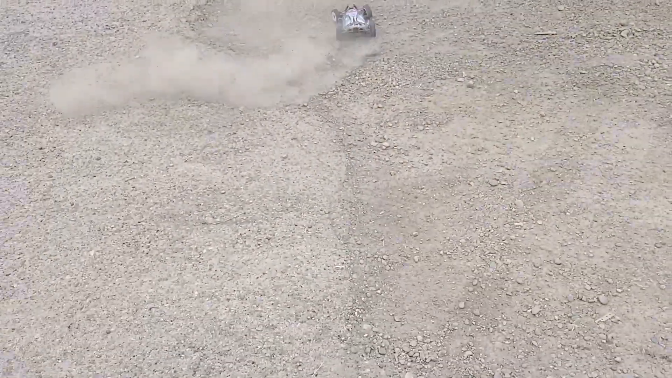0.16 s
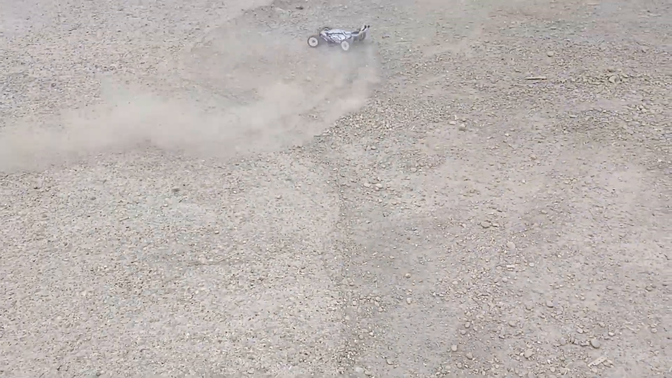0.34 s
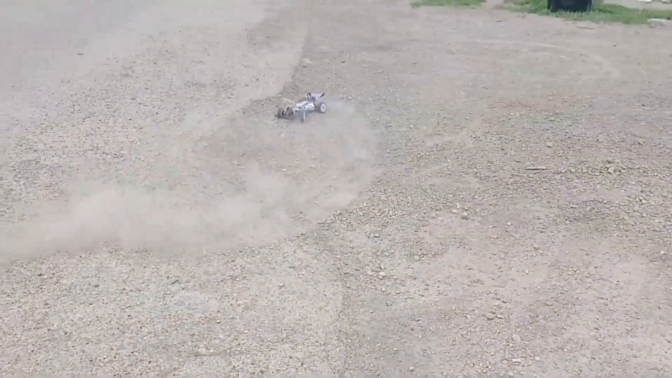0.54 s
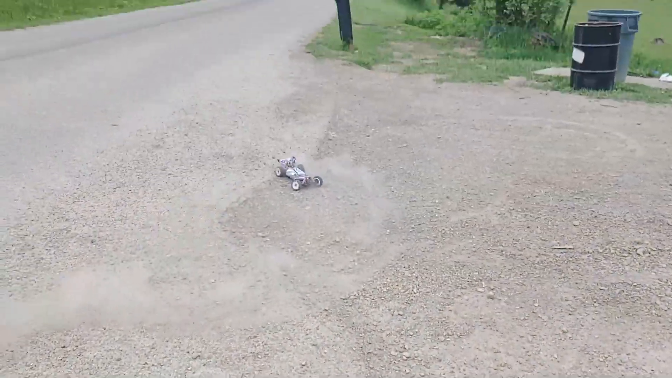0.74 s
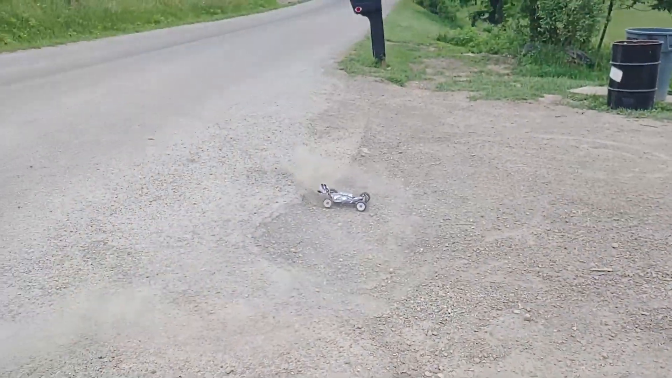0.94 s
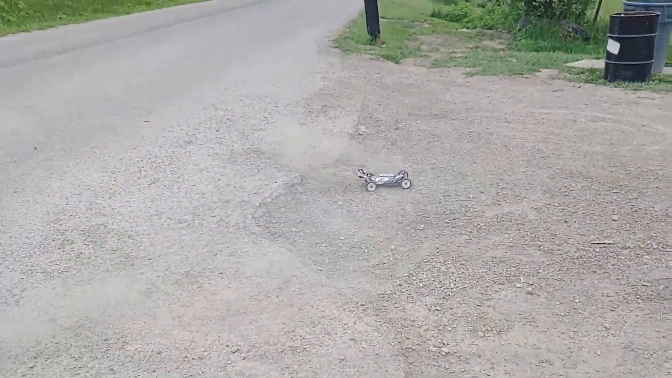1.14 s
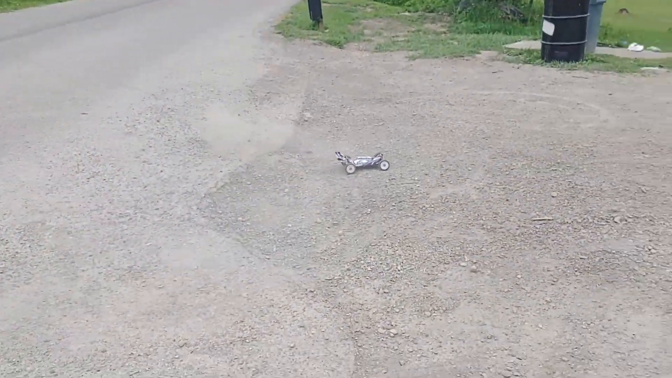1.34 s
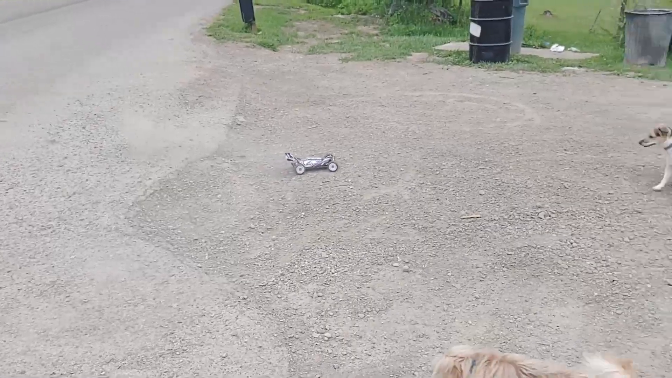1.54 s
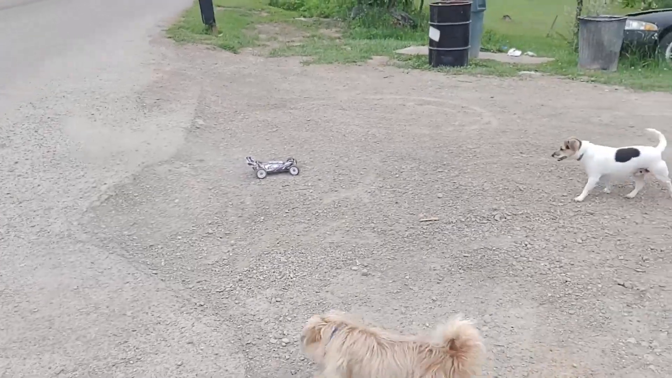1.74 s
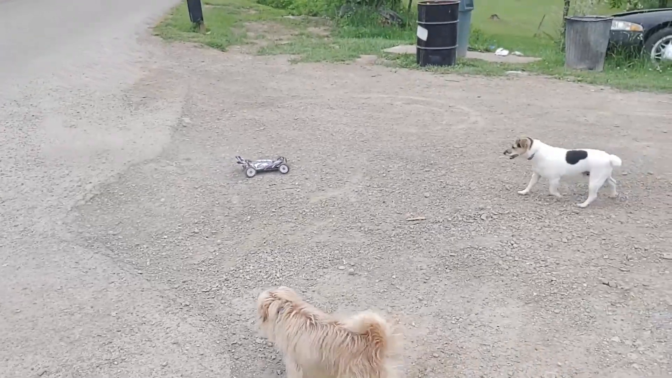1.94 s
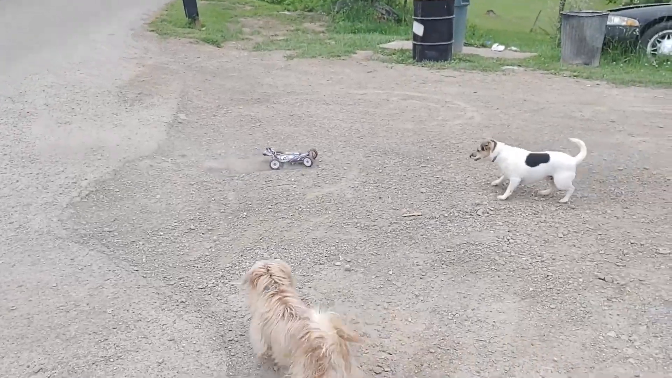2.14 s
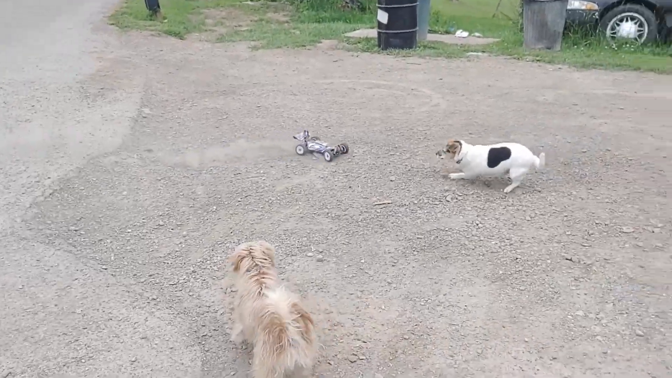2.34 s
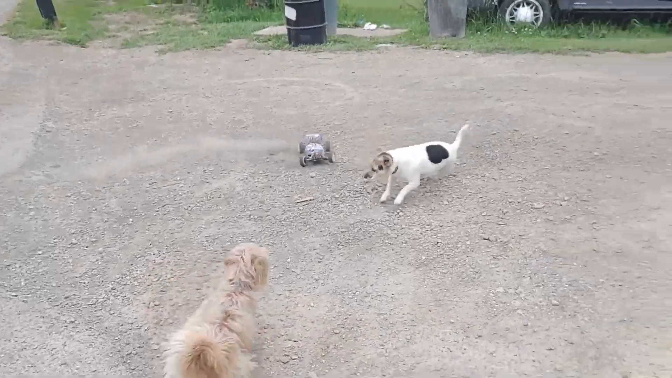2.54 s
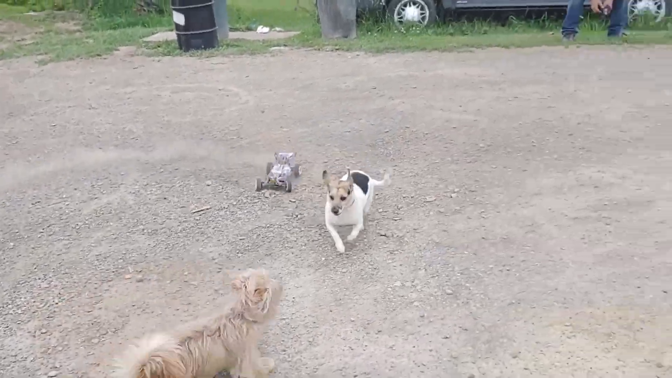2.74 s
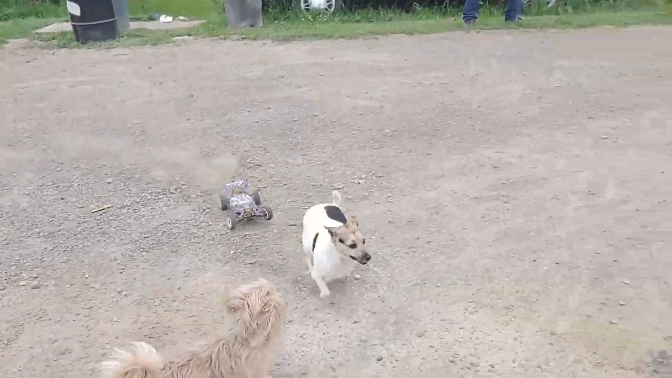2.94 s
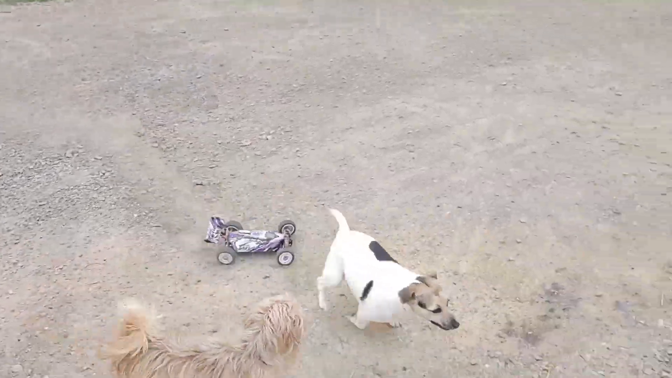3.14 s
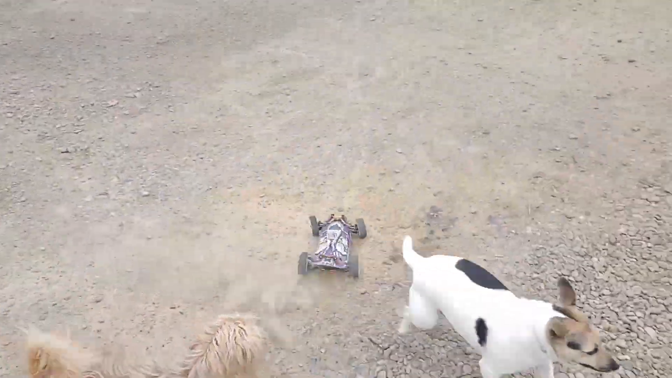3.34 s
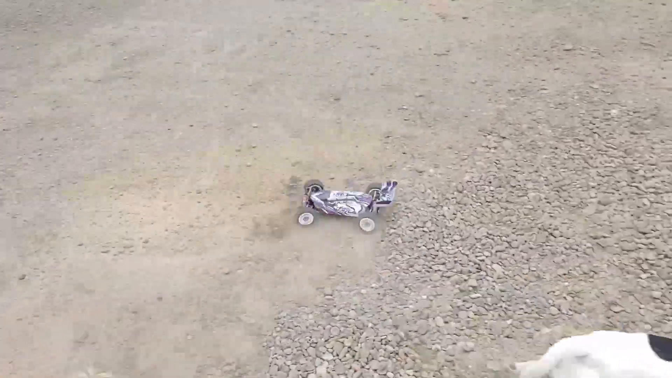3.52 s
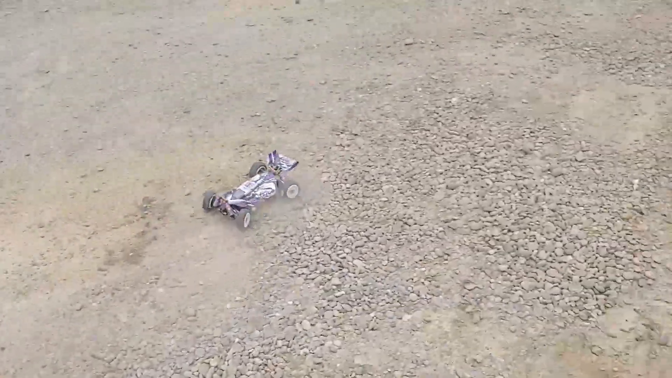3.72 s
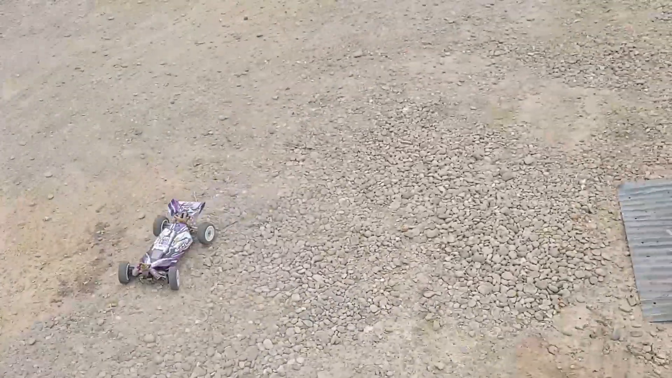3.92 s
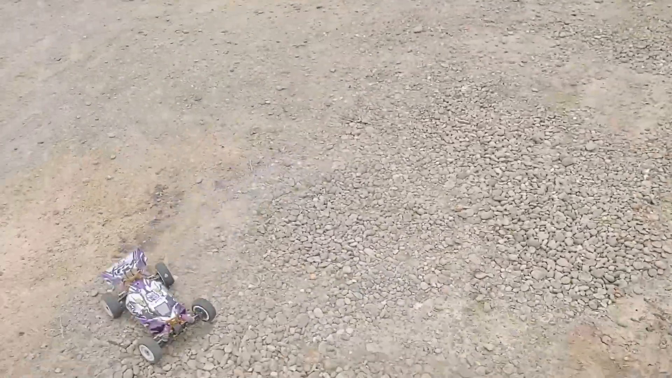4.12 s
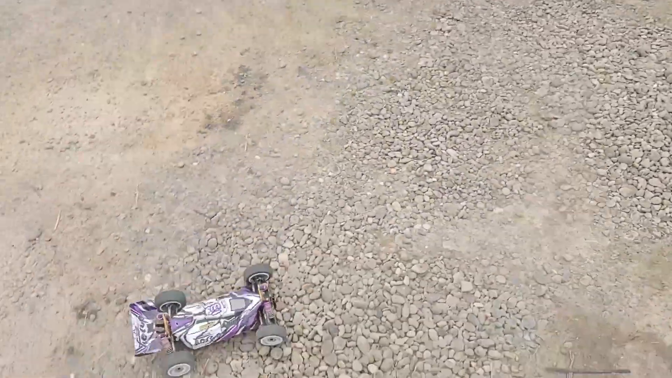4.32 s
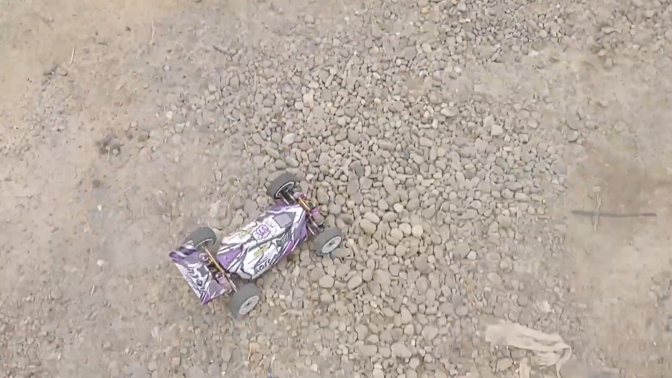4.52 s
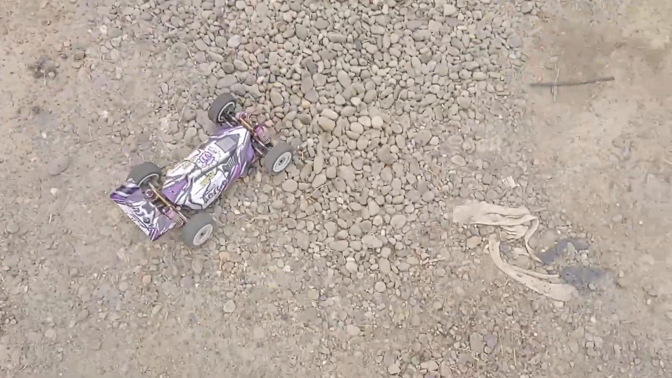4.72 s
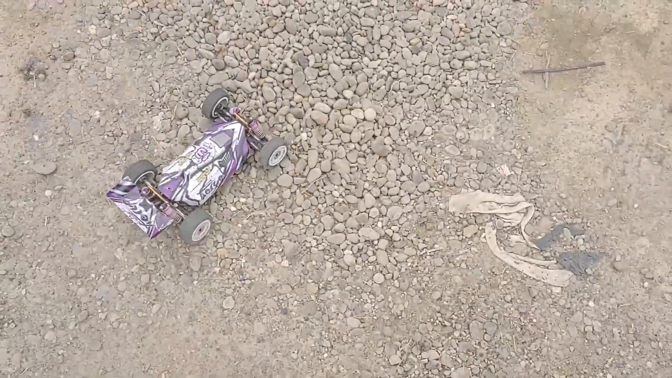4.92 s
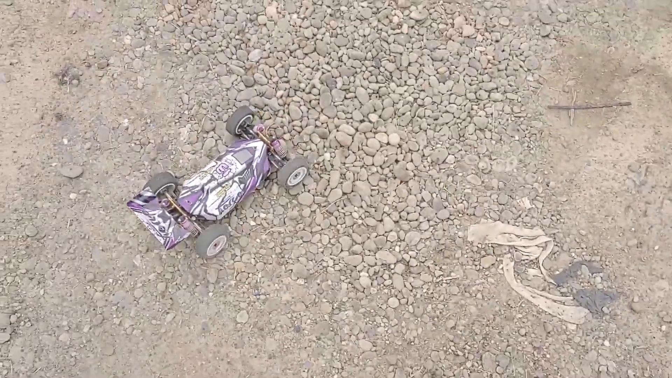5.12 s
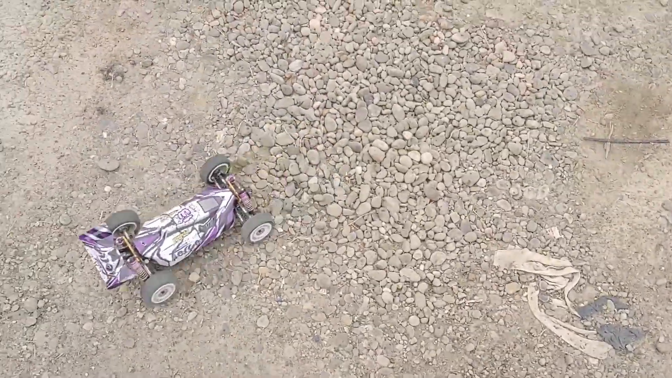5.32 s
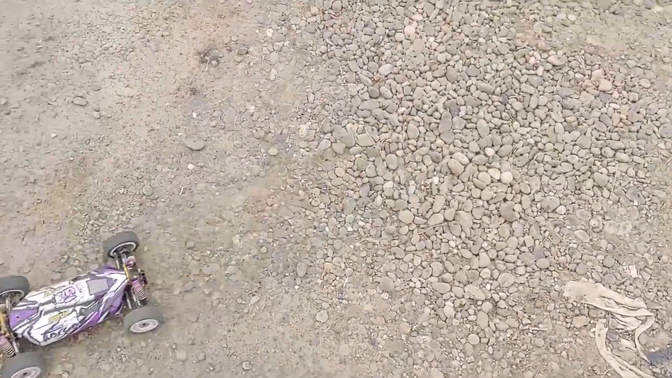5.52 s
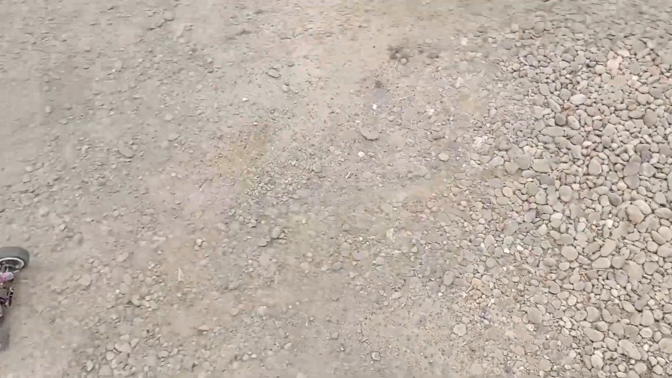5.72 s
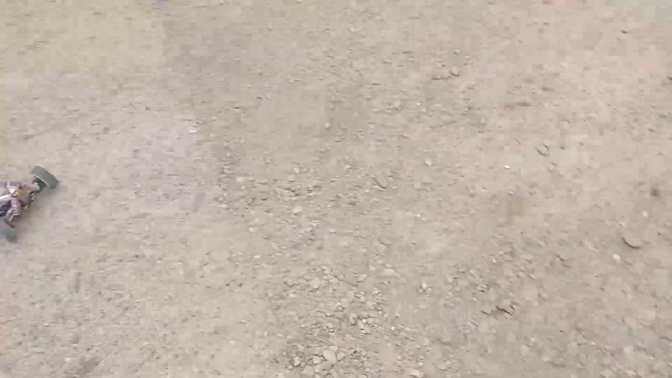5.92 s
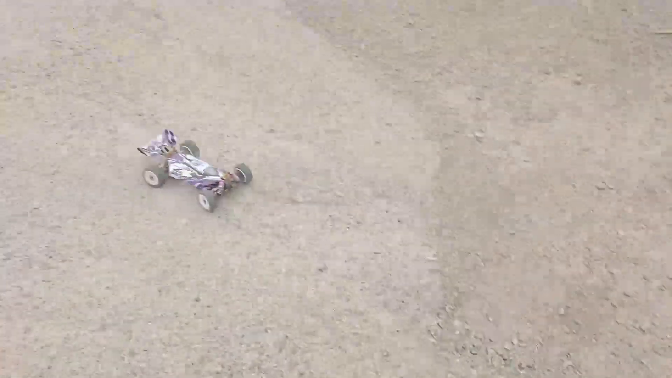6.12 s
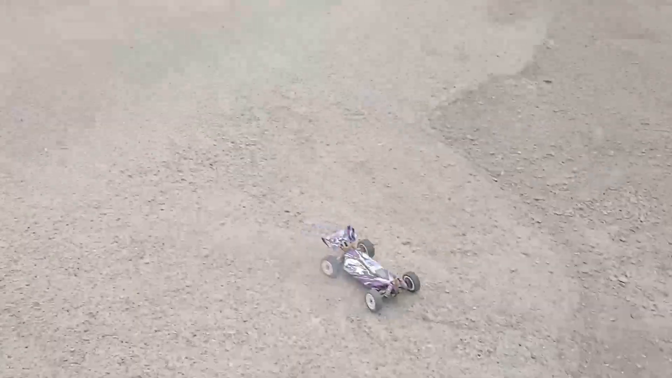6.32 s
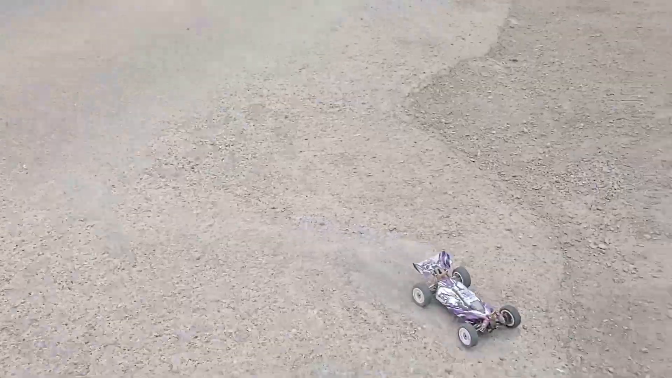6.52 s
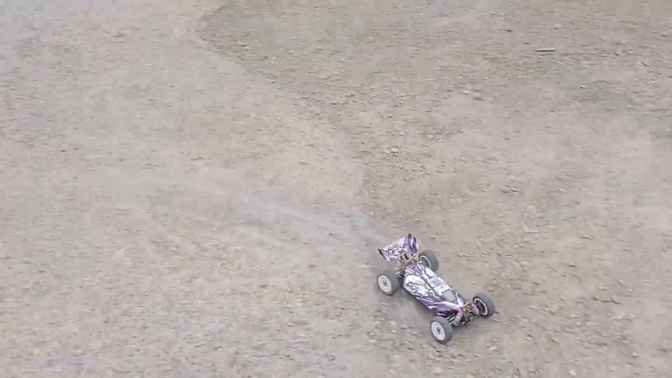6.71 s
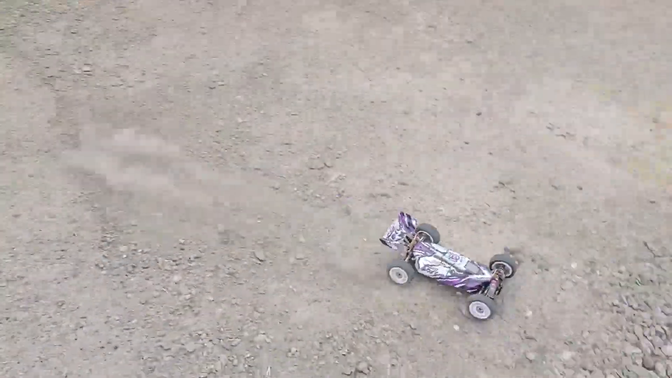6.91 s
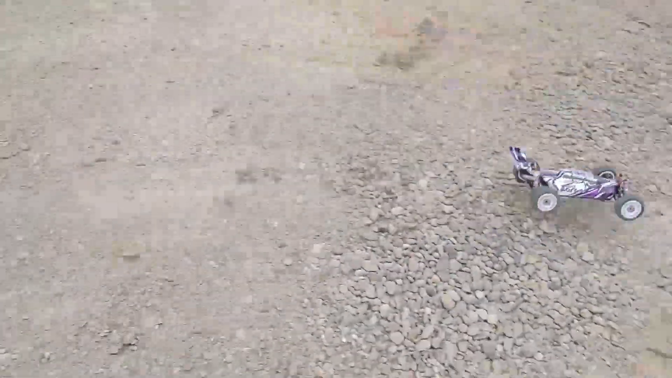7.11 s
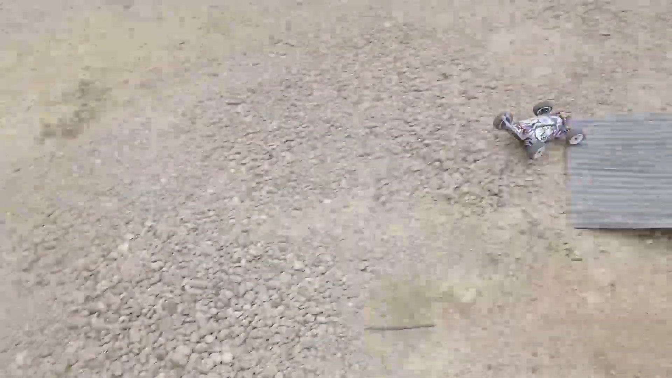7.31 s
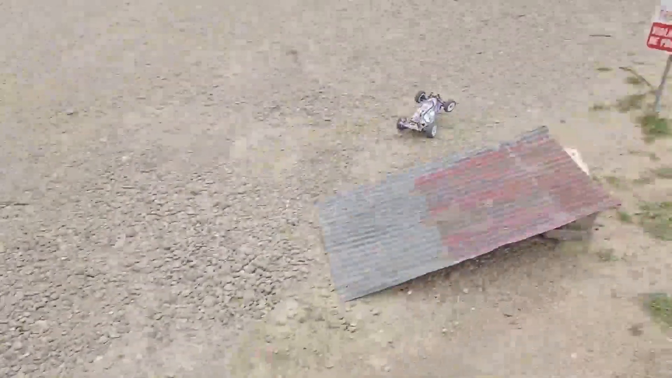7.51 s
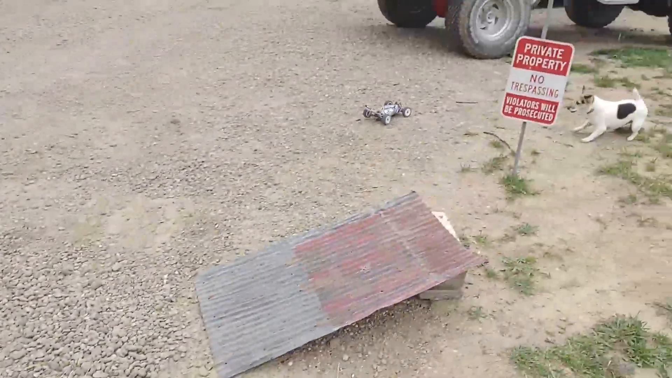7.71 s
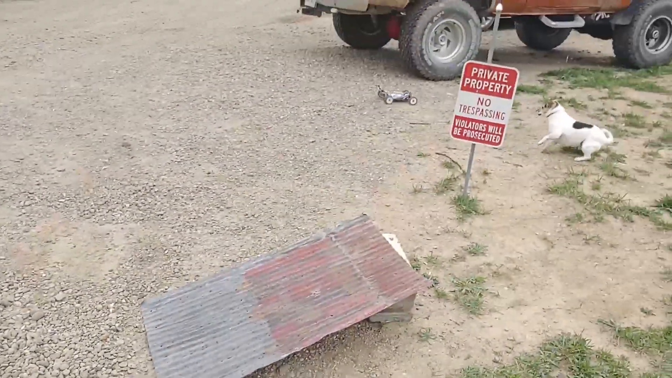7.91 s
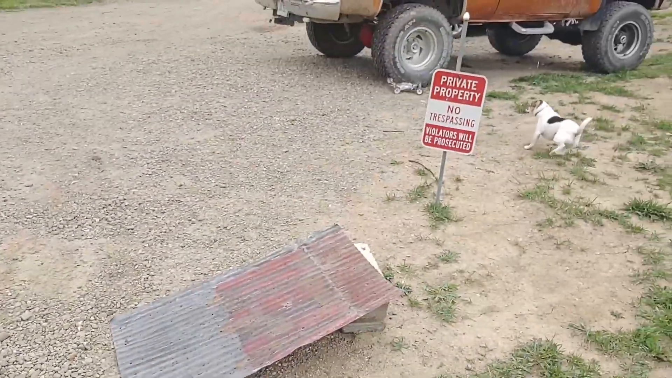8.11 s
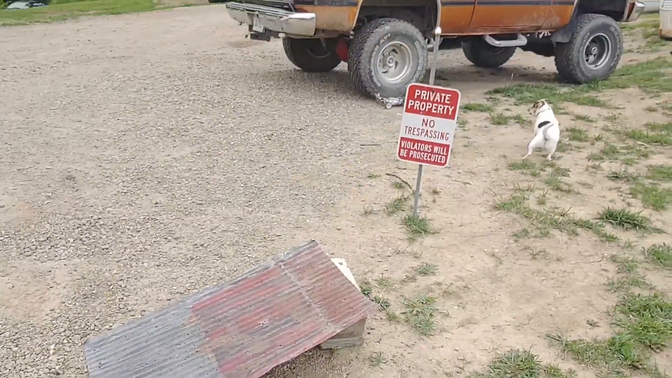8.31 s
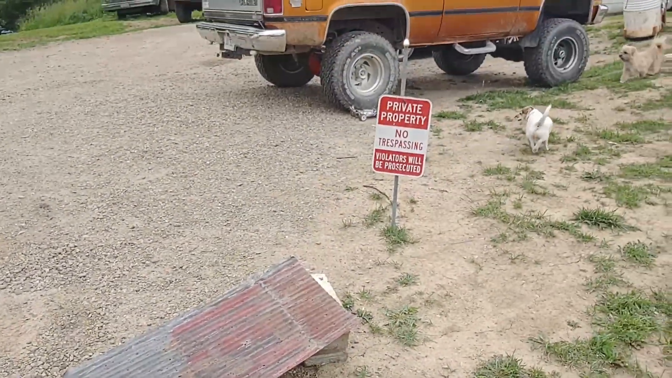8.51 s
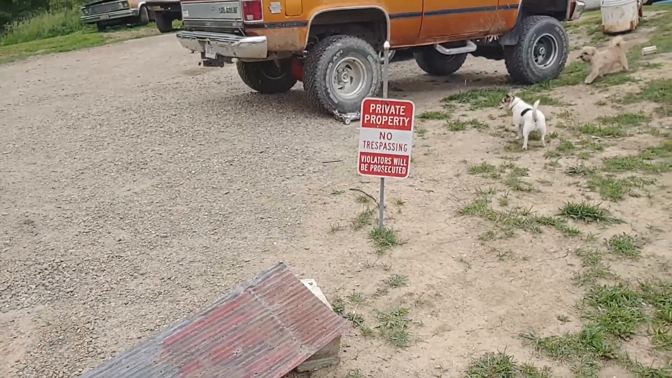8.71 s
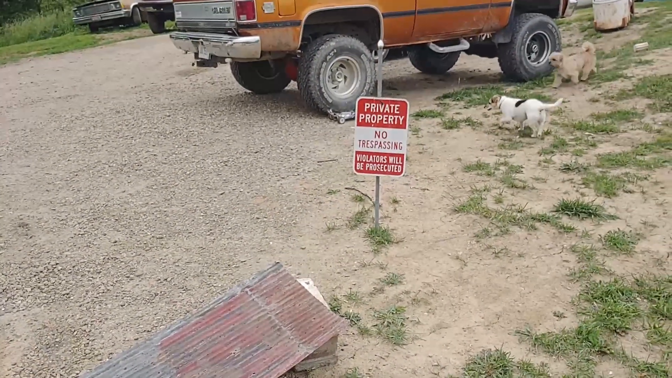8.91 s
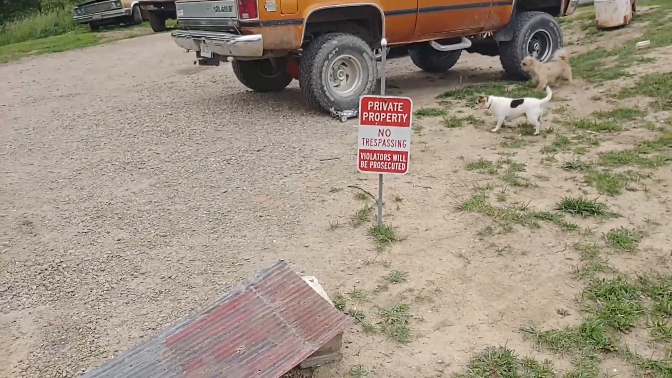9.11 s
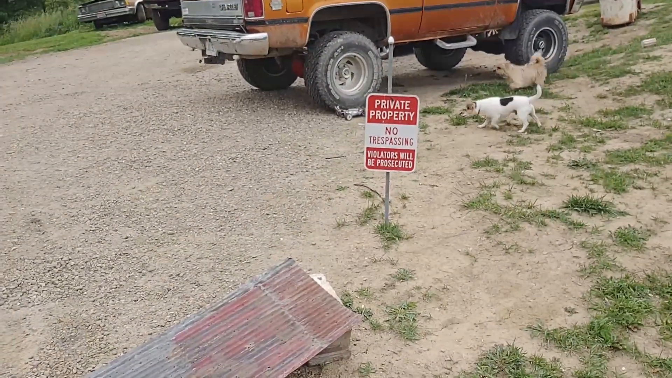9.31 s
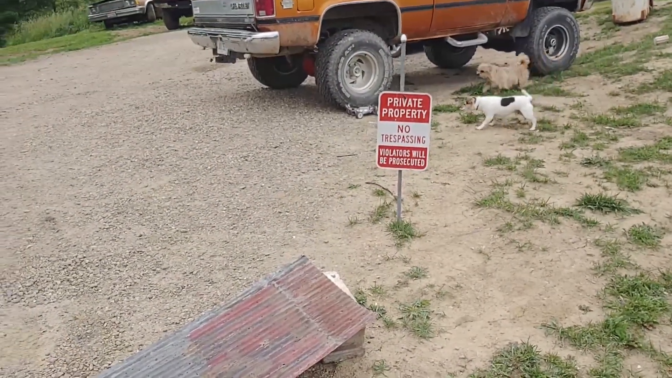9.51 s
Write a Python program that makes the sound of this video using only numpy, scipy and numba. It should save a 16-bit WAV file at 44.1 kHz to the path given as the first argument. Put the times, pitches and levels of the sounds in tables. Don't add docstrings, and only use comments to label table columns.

```python
import sys
import numpy as np
from scipy import signal
from scipy.fft import rfft, irfft, next_fast_len
from scipy.io import wavfile
from scipy.ndimage import uniform_filter1d, map_coordinates
from numba import njit

SR = 44100
rng = np.random.default_rng(int(sys.argv[2]) if len(sys.argv) > 2 else 0)


def gain_from_db(level_db):
    decades = np.asarray(level_db, float) / 20
    return 10 ** decades


def generate_wav(signal):
    frames = np.transpose(np.atleast_2d(signal))
    scaled = np.clip(frames, -1, 1) * 32767
    pcm = np.round(scaled).astype(np.int16)
    wavfile.write(sys.argv[1], SR, pcm)


N = 421155


def rms_one(x):
    return x / np.sqrt(np.mean(x ** 2) + 1e-20)


def in_time(rows):
    s, *columns = np.transpose(rows)
    return [np.interp(np.arange(N) / SR, s, column) for column in columns]


def coloured(x, points, share=1, late=((1, 0), (2, 0))):
    size = next_fast_len(N + 2048)
    hz = np.arange(1, size // 2 + 2) * SR / size
    points_hz, points_db = np.transpose(points)
    gain = gain_from_db(share * np.interp(np.log(hz), np.log(points_hz), points_db))
    lag = np.exp(-1j * np.interp(hz, *np.transpose(late)))
    return irfft(rfft(x, size) * gain * lag, size)[..., :N]


def passed(x, hz, kind, order=2):
    return signal.sosfilt(signal.butter(order, hz, kind, fs=SR, output="sos"), x)


def drift(hz):
    r = np.exp(-2 * np.pi * hz / SR)
    walk = signal.lfilter([1], [1, -2 * r, r * r], rng.standard_normal(N + SR))
    return rms_one(walk[SR:])


def grains(per_s, coarse_db, clump_db):
    born = rng.random(N) < per_s * gain_from_db(clump_db * drift(25)) / SR
    size_db = coarse_db * np.minimum(rng.exponential(1, N), 4.4)
    clicks = born * gain_from_db(size_db) * rng.choice([-1, 1], N)
    return clicks / np.sqrt(uniform_filter1d(clicks ** 2, SR // 4) + 1e-3)


@njit
def resonate(x, hz, r):
    y = np.zeros(len(x))
    for i in range(2, len(x)):
        y[i] = x[i] - x[i - 2] + 2 * r * np.cos(hz[i]) * y[i - 1] - r * r * y[i - 2]
    return y * (1 - r * r) / 2


def ring(x, hz, width_hz):
    turn = 2 * np.pi / SR * hz * np.ones(len(x))
    return resonate(x + 1e-18, turn, np.exp(-np.pi * width_hz / SR))


def body(x, modes):
    total = 0
    for k, (hz, width_hz, db) in enumerate(modes):
        total = total + gain_from_db(db) * ring(x, hz, width_hz) * (-1) ** k
    return rms_one(total)


# t/s, tyre effort level/dB, motor load level/dB,
# hollow underside facing us level/dB, treads digging in level/dB
FIRST_RUN = [
    (0, -30.5, -29.5, -6, 3.5),
    (.55, -30, -33.5, -1, 2),
    (.8, -29, -30, -11, -1),
    (1.05, -32, -31, 0, 1),
    (1.2, -45.5, -50, 0, -1),
    (1.44, -51, -57, -37, 1),
    (1.68, -58, -68.5, -5, -3),
    (1.99, -65, -74, -25, -31),
]
SECOND_RUN = [
    (2.0, -66, -66, 0, -8),
    (2.05, -61.5, -45, -2.5, -1.5),
    (2.4, -31.5, -31, -5.5, 0),
    (2.95, -28, -36, -5, 3.5),
    (3.6, -21.5, -28, -6.5, 4),
    (4.35, -28.5, -28.5, -12, -2),
    (4.53, -22, -41.5, 8.5, 6),
    (4.93, -46.5, -66, -3, 7.5),
    (5.19, -49.5, -54, -4, 1.5),
]
REVERSE_RUN = [
    (5.225, -55, -53.5, 4.5, 1),
    (5.37, -32.5, -34, 0.5, -1.5),
    (5.58, -30, -32, 4, 0.5),
    (5.8, -29.5, -35, 3.5, -2),
    (6.0, -36.5, -39.5, 4.5, -0.5),
]
LAST_RUN = [
    (6.02, -41, -27.5, -4.5, -13),
    (6.11, -27.5, -18.5, -20, -9.5),
    (6.4, -26, -22.5, -10, -4),
    (6.75, -24, -25.5, -3.5, 1),
    (7.05, -24.5, -34.5, 0, 9.5),
    (7.4, -21, -38.5, -5.5, 6),
    (7.65, -28, -30, -1.5, 6),
    (8.1, -29.5, -46.5, 0.5, 7.5),
]
ROLL_AWAY = [
    (8.3, -41, -60.5, 13.5, 12.5),
    (8.45, -52, -65.5, 7, 15.7),
    (8.6, -59, -57, 7.8, 7.9),
    (8.8, -62, -65, 0.5, 4.5),
    (9.55, -91, -92, 23, 8),
]
# t/s, body level/dB, grit level/dB, half length/s
RUTS = [(0.033, 7.5, -4, 0.033), (0.053, -13, 5.5, 0.042), (0.1, -3, -11, 0.05), (0.345, 5, 8, 0.042),
        (0.614, 11.5, 2, 0.0092), (0.92, -9.5, -4, 0.04), (1, -4, -1, 0.032), (1.365, 9, 9, 0.08),
        (2.62, 4, 8.5, 0.045), (2.897, 8.5, 7.5, 0.029), (3.33, 9, -2, 0.013), (3.67, 10.5, 9.5, 0.02),
        (3.716, -13, -3.5, 0.047), (3.805, -4, 15.5, 0.036), (3.88, -6, -14.5, 0.097),
        (3.983, 7, -5, 0.028), (4.04, -9.5, -6, 0.089), (4.445, 1.5, -12, 0.042), (6.25, -3.5, -1, 0.077),
        (6.7, -1, 3.5, 0.063), (7.155, 3.5, 8.5, 0.035), (7.231, -8.5, -3, 0.093), (7.39, 18, 13, 0.021),
        (7.412, -34, -9.5, 0.028), (7.624, 5, 4.5, 0.043), (7.829, -5, -10, 0.034), (8.009, -9, 25, 0.018),
        (8.12, 6, 0.5, 0.03), (8.256, 14, 8.5, 0.074)]


def buggy_levels():
    runs = FIRST_RUN + SECOND_RUN + REVERSE_RUN + LAST_RUN + ROLL_AWAY
    tyre_db, motor_db, facing_db, dig_db = in_time(runs)
    s, body_db, grit_db, half_s = np.transpose(RUTS)
    t = np.arange(0, N + 64, 64) / SR
    humps = np.clip(1 - np.abs(t[:, None] - s) / np.clip(half_s, .005, .2), 0, 1)
    jolt_db = np.interp(np.arange(N) / SR, t, humps @ body_db)
    spit_db = np.interp(np.arange(N) / SR, t, humps @ grit_db)
    spray_db = tyre_db + spit_db
    crush_db = motor_db + dig_db + 0.89 * jolt_db
    drone_db = motor_db + facing_db + 1.33 * jolt_db
    whine_db = motor_db + jolt_db
    rumble_db = -15.5 + 0.92 * motor_db + 0.23 * facing_db + 1.44 * dig_db + jolt_db
    return (spray_db, crush_db), (drone_db, whine_db, rumble_db)


# f/Hz, level/dB
SPRAY_COLOUR = [(880, -45), (1500, -15), (2630, -13.5), (4010, -13), (9500, -11), (11700, -8),
                (15400, -14.5), (16500, -35.5)]
# t/s, crush centre f/Hz, gear case ring f/Hz, coarseness of grains level/dB
GROUND = [(0.0, 1610, 2730, 2), (1.59, 1110, 2904, 5), (1.75, 1320, 2775, 4.5), (3.38, 1570, 2845, -1),
          (3.48, 1240, 2650, 1.5), (3.83, 1130, 2760, -2.5), (4.41, 1390, 2650, 7), (4.68, 1180, 3010, 7.5),
          (4.81, 1510, 2740, 7.5), (5.8, 1180, 2970, 1.5), (6.06, 1470, 3246, 0.5),
          (6.89, 1220, 2594, -6.5), (7.24, 1610, 3280, -0.5), (7.62, 792, 2730, 1), (7.79, 1400, 2560, 1),
          (8.03, 1750, 2706, 5.5), (8.4, 1330, 2620, 4), (9.55, 1435, 2860, 2)]


def tyres(bumps, spray_db, crush_db):
    crush_hz, _, coarse_db = in_time(GROUND)
    grit = grains(7000, coarse_db, clump_db=4.5)
    dealt = rng.integers(0, 8, N)
    chinks = 0
    for k, hz in enumerate(np.geomspace(2500, 15000, 8)):
        chinks = chinks + ring(grit * (dealt == k), hz, hz / 13.0) / np.sqrt(hz / 4000)
    spray = rms_one(coloured(rms_one(chinks) * 0.15 + .5 * grit, SPRAY_COLOUR))
    grind = grains(2500, 0.76 * coarse_db, clump_db=5.0)
    ridge = rms_one(ring(grind, crush_hz, 260))
    crush = rms_one(ridge + rms_one(passed(grind, [650, 1850], "band")))
    return gain_from_db(spray_db + 0.42 * bumps) * spray + gain_from_db(crush_db + 0.95 * bumps) * crush


# t/s, f/Hz, level/dB
MESH = [(.3, 5200, -70), (.45, 5400, -44), (1.1, 5550, -44), (1.25, 5500, -95), (2.5, 4900, -80),
        (2.8, 5000, -40), (3.1, 5300, -34), (3.4, 5200, -60), (4.33, 5050, -40), (4.5, 5000, -95),
        (5.25, 2500, -95), (5.45, 3200, -37), (5.75, 4900, -33), (5.9, 3700, -34), (6.0, 3300, -75),
        (6.1, 4800, -31), (6.38, 7700, -33), (6.55, 8500, -110)]
# f/Hz, width f/Hz, level/dB
CHASSIS = [(390, 193, -1.5), (447.4, 160, 6), (576, 162, 2.5)]
# multiple of the case ring [ratio], width f/Hz, level/dB
GEAR_CASE = [(.9, 260, 16.5), (1.0, 284, 24), (1.78, 540, 8.5)]


def drive(bumps, drone_db, whine_db, rumble_db):
    rattle = grains(2000, 4.9, clump_db=3.0)
    teeth = grains(7000, 0.94, clump_db=4.5)
    mesh_hz, mesh_db = in_time(MESH)
    mesh = rms_one(ring(ring(teeth, mesh_hz, 650), mesh_hz, 650))
    case_hz = in_time(GROUND)[1] * (1 + .035 * drift(9))
    case_modes = [(ratio * case_hz, width_hz, db) for ratio, width_hz, db in GEAR_CASE]
    drone = gain_from_db(drone_db + 0.89 * bumps) * body(ring(rattle, 840, 510), CHASSIS)
    whine = gain_from_db(whine_db) * body(passed(teeth, 2600, "high", order=4), case_modes)
    rumble = gain_from_db(rumble_db + 0.34 * bumps) * rms_one(passed(rattle, [170, 380], "band"))
    return drone + whine + rumble + gain_from_db(mesh_db) * mesh


def ground_echo(x):
    delay = 1.5 * SR / in_time(GROUND)[0]
    x = x - .45 * ring(x, 2100, 320)
    bounce = np.interp(np.arange(N) - delay, np.arange(N), x)
    return x - 0.016 * passed(bounce, 4100, "low", order=1)


# f/Hz, level/dB
AIR_COLOUR = [(260, -51.5), (450, -6.5), (1070, -17), (2470, -15), (3700, -32.5), (5220, -30.5),
              (10800, -37), (16000, -54)]


def open_air():
    return gain_from_db(-63) * rms_one(coloured(rng.standard_normal((2, N)), AIR_COLOUR))


# t/s, level/dB, left minus right level/dB
WIND = [(0.0, -57, 2), (1.33, -78, -4), (1.59, -63, 13), (1.86, -71.5, -5), (3.11, -65, -3),
        (3.99, -61, -1), (4.26, -64.5, -8), (6.22, -73, -1), (6.94, -48.5, 15), (8.35, -60.5, -7),
        (8.54, -39.5, -34.5), (8.96, -37.5, -35.5), (9.1, -38, -21.5), (9.55, -40.5, -30)]


def wind():
    level_db, pan_db = in_time(WIND)
    gusts = []
    for side in range(2):
        rush = passed(rng.standard_normal(N), [70, 170], "band")
        rush = passed(rush, 310, "low", order=4)
        gusts.append(rms_one(rush * gain_from_db(5.0 * drift(33))))
    side_db = np.array([np.minimum(pan_db, 0), np.minimum(-pan_db, 0)])
    return gain_from_db(level_db + side_db + 13.0) * gusts


# t/s, peak level/dB, ring f/Hz
CHIPS = [(0.0878, -7, 11100), (0.2074, -12, 13700), (0.2193, -3, 5340), (0.2997, -16, 5360),
         (0.3197, -15, 8580), (0.4494, -13, 11200), (0.5082, -19, 9650), (0.5761, -21, 12700),
         (0.5881, -22, 5370), (0.622, -15, 12300), (0.6804, -10, 7150), (0.7158, -21, 12500),
         (0.852, -10, 13800), (0.8786, -5.5, 11600), (0.9998, -13, 8750), (1.1767, -12, 13400),
         (1.222, -27, 10800), (1.2575, -22, 12000), (1.3004, -35, 11500), (1.3204, -10, 11100),
         (1.3895, -15.5, 13700), (1.433, -32, 11400), (1.494, -28, 13300), (2.3381, -22, 10200),
         (2.4542, -19, 11200), (2.5514, -11.5, 9400), (2.6005, -10, 10200), (2.654, -11.5, 8300),
         (2.71, -19, 6770), (2.7272, -17, 12900), (2.828, -19, 5500), (3.0729, -12.5, 5340),
         (3.0879, -17, 5390), (3.2196, -1, 12400), (3.267, -14, 12300),
         (3.3607, -15, 6430), (3.3844, -5.5, 9700), (3.403, -13.5, 5980), (3.441, -15, 9770),
              (3.466, -15, 8660), (3.4879, -12, 12100), (3.517, -7, 5900), (3.586, -3.5, 12100),
              (3.6431, -6, 11700), (3.6755, 9, 12400), (3.7733, -12.5, 11000), (3.7942, -7, 12200),
              (3.9139, -13.5, 12100), (3.9459, -9.5, 7500), (4.0043, -7.5, 7500), (4.0447, -4.5, 11500),
              (4.084, -3, 11900), (4.1308, -4, 6060), (4.1659, -4, 6000), (4.2138, -21, 8210),
              (4.2326, -5, 7400), (4.3011, -18.5, 5300), (4.3504, -10.5, 4960), (4.3824, -10, 12800),
              (4.4046, -2, 5530), (4.4497, -21, 12600), (4.4976, -22, 5210), (4.5096, -4.5, 7750),
              (4.531, -9.5, 11500), (4.5844, -12, 12500), (4.612, -10, 12000), (4.6516, -21, 10500),
              (4.6637, -10, 13100), (4.679, -10.5, 10800), (4.6994, -7.5, 5050), (4.7461, -5.5, 11800),
              (4.7954, -21, 11300), (4.8234, -19, 13000), (4.8623, -16, 13000), (4.9087, -16.5, 11800),
              (4.9207, -13.5, 12400), (4.9561, -20, 12300), (5.0409, -25, 13400), (5.0868, -32, 10400),
              (5.1062, -36, 11900), (5.1475, -22, 11600), (5.1651, -28, 12200), (5.1875, -35, 12100),
              (5.208, -29, 13000), (5.2603, -19.5, 12700), (5.2828, -38, 10200), (5.3272, -31, 5360),
         (5.3814, -13, 5300), (5.4525, -22, 5330), (5.4889, -12, 12500), (5.5069, -15, 12200),
              (5.5175, -13, 10300), (5.5713, -24, 12600), (5.5852, -14, 12400), (5.6012, -12.5, 12400),
              (5.6526, -15, 9840), (5.663, -10.5, 12200), (5.7134, -16, 5430), (5.7346, -10.5, 5120),
              (5.771, -7, 12200), (5.7702, -23, 5230), (5.7888, -18, 5250), (5.8127, -20, 12300),
              (5.8506, -16, 11900), (5.9245, -27.5, 9030), (5.9245, -20, 6880), (5.975, -22, 6110),
              (6.2402, -29, 6570), (6.4737, -32, 11160), (6.6902, -19, 10760), (6.775, -10, 5490),
              (6.8474, -10, 12800), (6.8713, -16, 11300), (6.8887, -13, 11730), (6.9496, -20, 11600),
              (6.999, -11, 11600), (7.071, -10, 10490), (7.133, -4.5, 11400), (7.1641, -6, 10140),
              (7.341, -5, 10960), (7.504, -4, 5350), (7.616, -5, 11300), (7.713, 4, 10560),
              (7.7675, 1, 11600), (7.8222, -5.5, 11600), (7.882, -7, 11900), (7.894, -7, 7000),
              (7.9479, -13, 10900), (7.9888, -21, 11000), (8.0045, 0, 7070), (8.0596, -15, 11900),
              (8.099, -2.5, 11800), (8.1485, -1, 7200), (8.217, -5.5, 12400), (8.24, -17.5, 11200),
              (8.257, -9, 10860), (8.3875, -14.5, 11100), (8.423, -23, 10300), (8.537, -30, 10600),
              (8.7085, -32, 9700),
         (1.1563, -22, 13400), (1.4044, -32, 13900), (4.802, -22, 10800), (4.9754, -28, 11100),
              (8.3657, -22, 11600), (8.449, -29, 11500), (8.4856, -30, 11700), (8.514, -31, 11000),
              (8.5769, -32, 10800), (8.6253, -31, 11500), (8.7243, -29, 10000)]


def chips():
    out, t = np.zeros(N + 1024), np.arange(1024) / SR
    envelope = gain_from_db(-60 * t / 0.0074) * np.minimum(t / 0.00059, 1)
    for s, peak_db, hz in CHIPS:
        burst = rng.standard_normal(1024) * envelope
        hit = rms_one(ring(burst, hz, 0.054 * hz)) + 0.37 * rms_one(passed(burst, 4500, "high"))
        out[round(s * SR):][:1024] += gain_from_db(peak_db) * hit / np.abs(hit).max()
    return out[:N]


# t/s, peak level/dB, ring f/Hz, tail level/dB
STONES = [(.0892, -25, 1800, 18), (.1994, -11, 1700, -34.5), (.222, -5.5, 2600, -12),
          (.682, -17, 4970, -12), (.8779, -15, 2970, -11), (1.171, -15, 2740, -2.5), (1.3206, -23, 2870, 1),
          (2.6322, -9, 1740, -5), (2.7085, -1.5, 2850, -7), (3.089, -7.5, 8000, -30),
          (3.2182, -19.5, 1210, 8.5), (3.3283, 2, 1720, -16.5), (3.3609, -12, 2660, 1),
          (3.469, -10, 1320, -27), (3.4876, -11.5, 2580, 0.5), (3.598, -6.5, 2410, -23.5),
          (3.7828, -7, 1090, -15.5), (3.8206, -6, 5300, 1.5), (3.9449, -7, 3730, 1),
          (4.005, -15, 6500, 4.5), (4.0831, -12, 4300, 1), (4.1304, -4, 3870, 1),
          (4.1659, -10, 2660, -10.5), (4.2336, -13.5, 4360, 2), (4.382, -13.5, 2080, 0.5),
          (4.4062, -16.5, 2340, 9), (4.4448, -8.5, 2470, -11.5), (4.514, -10.5, 2460, -8),
          (4.6049, -12.5, 2950, -8), (4.7004, -5, 5360, -26),
          (5.7361, 5, 3280, -15), (5.771, 0.5, 5240, -30), (5.925, -13, 3100, -43),
               (6.0192, -24, 3060, 2.5), (6.778, -3.5, 2580, -14), (7.992, -15, 2290, -26.5),
               (6.889, -11, 4970, -20.5), (7.0727, -2, 2200, -29), (7.3178, -14.5, 1665, 0),
               (7.387, -8, 3860, -20.5), (7.507, -7, 3180, 1), (7.605, -8, 2670, -1),
               (7.9185, -9.5, 2790, -22), (7.7696, -13.5, 2340, -0.5), (7.8813, -17.5, 8000, 8),
               (7.963, -5.5, 2070, -13), (8.0026, -12, 2477, -9.5), (8.0072, -4, 1800, -11),
               (8.15, -9, 3200, 0.5), (8.2168, -21.5, 2700, -0.5), (8.075, -12.5, 1810, -19)]
# t/s, peak level/dB, ring f/Hz, tail level/dB
PEBBLES = [(4.966, -31, 1300, -15), (4.813, -28, 3150, -12), (1.306, -31, 2800, -12),
           (1.4346, -27, 1300, -4), (4.7465, -18, 5000, -22), (4.68, -28, 2500, -13),
           (4.76, -28.5, 900, -11.5), (4.923, -29, 6000, -13), (4.798, -30, 4770, 0.5),
           (4.8373, -18, 2900, -23), (4.711, -22, 600, -15), (4.91, -26.5, 2980, -2),
           (4.9535, -37, 1690, 1.5), (4.999, -27, 3040, -23), (5.052, -37, 2790, -3),
           (5.143, -35, 9300, -9), (8.388, -27, 2430, 1), (8.424, -43, 7200, -7.5), (8.554, -28.5, 2030, 1),
           (8.709, -42, 7230, -1.5), (8.893, -44, 8000, -7), (8.995, -46, 8000, -12),
           (4.548, -17, 2980, -20), (4.584, -19.5, 1480, -1.5), (4.634, -17, 2020, -9)]


def stones():
    out, t = np.zeros(N + 4096), np.arange(4096) / SR
    coarse_db = in_time(GROUND)[2]
    for s, peak_db, hz, tail_db in STONES + PEBBLES:
        away_db = -15 if s > 8.5 else 0
        bright_db = -4 + 1.5 * coarse_db[round(s * SR)] + 2.7 * np.log2(hz / 3500) + away_db
        t60_s = np.clip(0.079 * np.exp(0.63 * tail_db), .01, .3)
        strike = gain_from_db(-60 * t / 0.0016) * np.minimum(t / 0.0011, 1)
        tail = gain_from_db(tail_db - 60 * t / t60_s) * np.minimum(t / .0012, 1)
        burst = rng.standard_normal(4096) * (strike + tail)
        knock = ring(burst, hz, 0.31 * hz)
        crack = passed(burst, 3700, "high")
        thud = passed(burst, [380, 1100], "band")
        scatter = passed(burst, [450, min(4.4 * hz, 15500)], "band", order=1)
        hit = knock / np.abs(knock).max() + gain_from_db(bright_db) * crack / np.abs(crack).max()
        hit = hit + gain_from_db(away_db - 7.0) * scatter + 0.46 * thud
        out[round(s * SR):][:4096] += gain_from_db(peak_db - 0.5) * hit
    return out[:N]


# t/s, peak level/dB, ring f/Hz
THUMPS = [(0.099, -17, 326), (3.746, -18.5, 337), (3.778, -19.5, 227), (3.795, -13.5, 386),
          (7.068, -16.5, 305), (7.478, -19, 263), (7.612, -18, 245), (7.663, -21, 240), (7.88, -22.5, 380),
          (8.048, -29, 500), (8.222, -22.5, 497)]


def thumps():
    out, t = np.zeros(N + 4096), np.arange(4096) / SR
    for s, peak_db, hz in THUMPS:
        hit = np.sin(2 * np.pi * hz * t) * np.minimum(t * hz, 1) * gain_from_db(-60 * t * hz / 6.1)
        out[round(s * SR):][:4096] += gain_from_db(peak_db) * hit / np.abs(hit).max()
    return out[:N]


# t/s, extra lag at right port [samples], spread of lags [samples]
BEARING = [(0, 0, 1.26), (1.2, -1.16, 1.06), (2.3, -1, 1.4), (3.1, 1.5, 0.83), (3.6, 1, 3.07),
           (5.3, 2.5, 2.34), (5.9, 7.5, 2.1), (6.1, 0.5, 2.7), (6.9, -4, 2.2), (7.3, -6, 2.1),
           (8.2, 2, 1.6), (8.5, 0, 1.3)]


def open_ground(x):
    lag, spread = in_time(BEARING)
    late = map_coordinates(x, [np.arange(N) - lag - np.abs(spread) * drift(300)], order=3)
    t = np.arange(SR // 3) / SR
    tail = rng.standard_normal((2, len(t))) * gain_from_db(-60 * t / 0.21) * (t > .01)
    tail = passed(tail, [300, 3500], "band")
    far = signal.fftconvolve(x[None], tail, axes=1)[:, :N]
    return np.array([x, late]) + gain_from_db(-40.0) * far


# f/Hz, level/dB
PORTS = [(200, 0), (700, 1.5), (1400, 2.5), (2100, -5.5), (2900, -7), (4200, 0.5), (8000, 2), (15000, -1.5)]
# f/Hz, phase/rad
RIGHT_PHASE = [(200, 0), (1550, .2), (2600, 1.2), (4100, 3.14), (6000, 6.3), (16000, 12)]


def microphone_ports(x):
    left, right = x
    return np.array([coloured(left, PORTS, 0.18), coloured(right, PORTS, -0.89, late=RIGHT_PHASE)])


def scene():
    bumps = drift(8.5)
    tyre_levels, drive_levels = buggy_levels()
    rolling = ground_echo(tyres(bumps, *tyre_levels) + drive(bumps, *drive_levels))
    hits = chips() + stones() + thumps()
    return microphone_ports(open_ground(rolling + hits) + open_air()) + wind()


def top_cut(x):
    return signal.sosfilt(signal.butter(12, 16990, fs=SR, output="sos"), x)


def record(dry):
    x = passed(dry, 39, "high")
    x = .92 * np.tanh(x / .92)
    x = signal.sosfilt(signal.ellip(8, .5, 28, 15850, fs=SR, output="sos"), x)
    x = signal.sosfilt(signal.ellip(10, .5, 60, 16800, fs=SR, output="sos"), x)
    return top_cut(x)


dry = scene()
out = record(dry)
generate_wav(out)
```